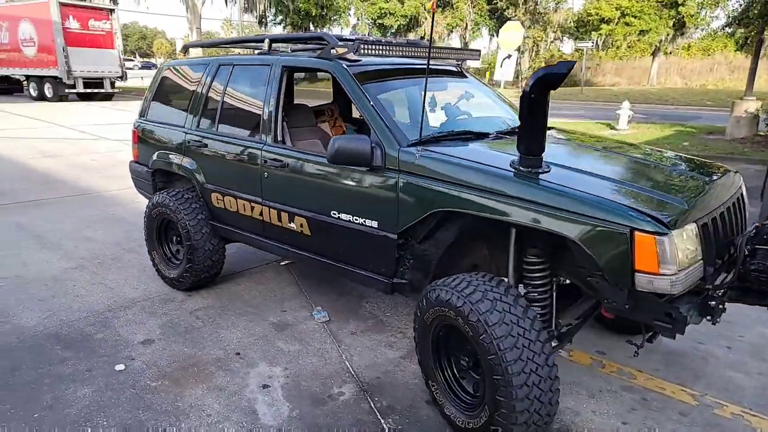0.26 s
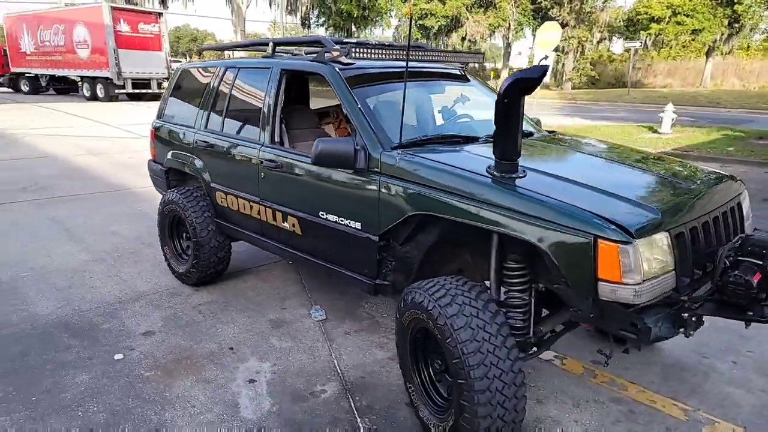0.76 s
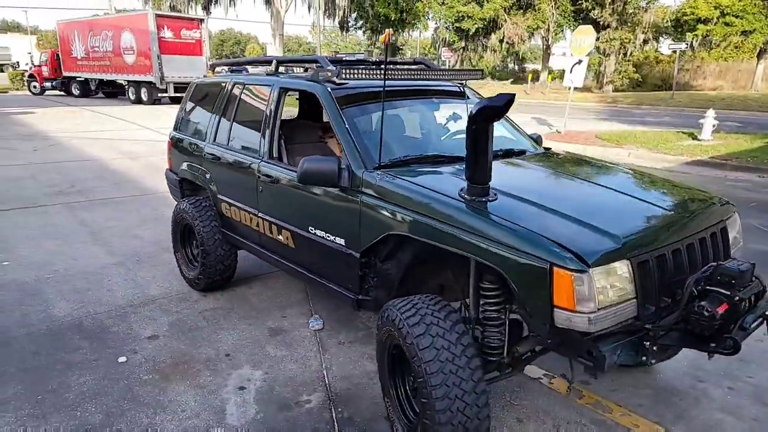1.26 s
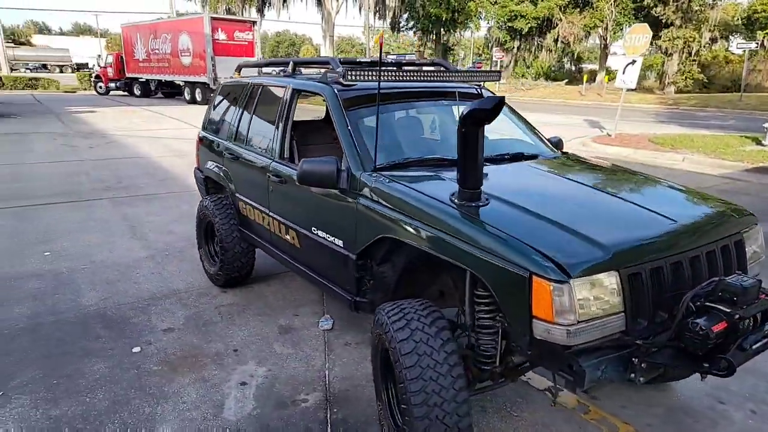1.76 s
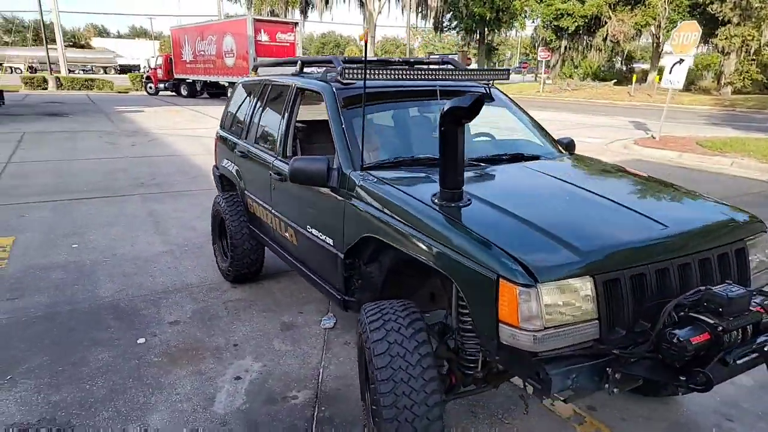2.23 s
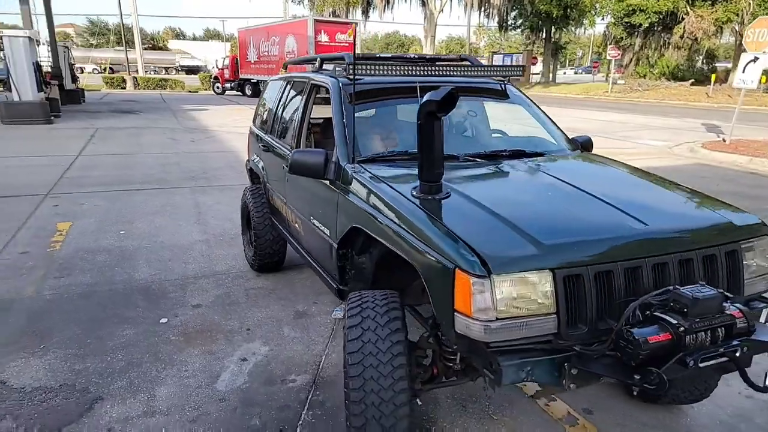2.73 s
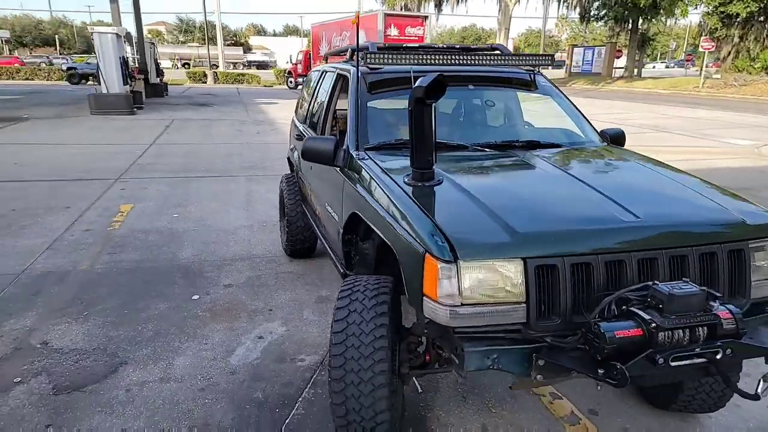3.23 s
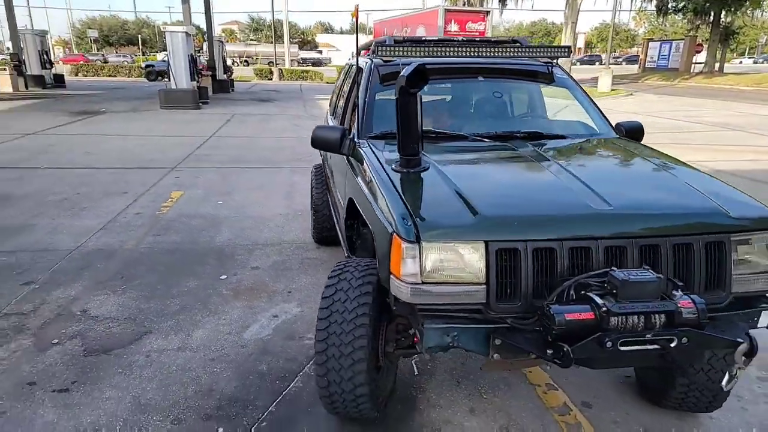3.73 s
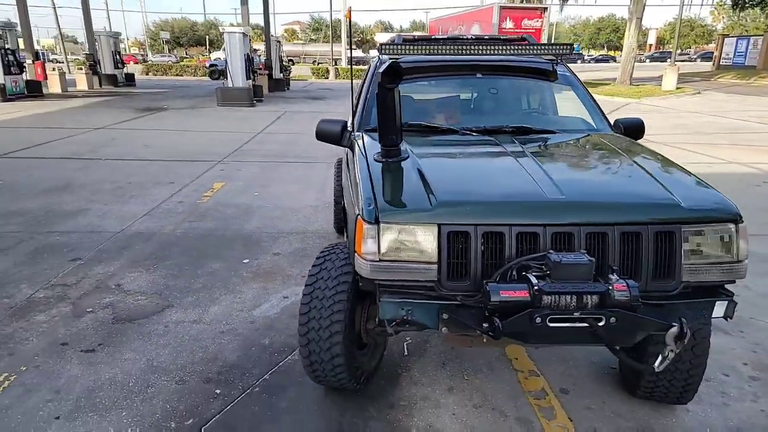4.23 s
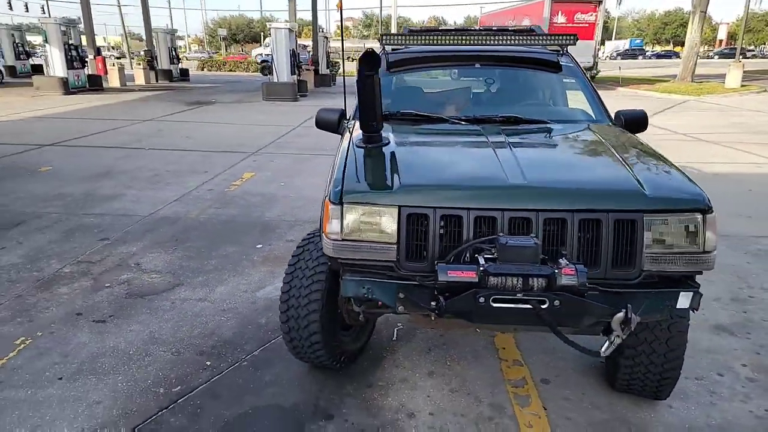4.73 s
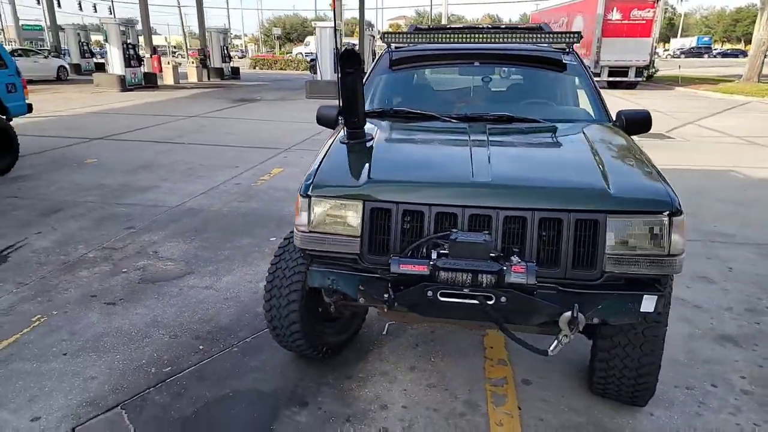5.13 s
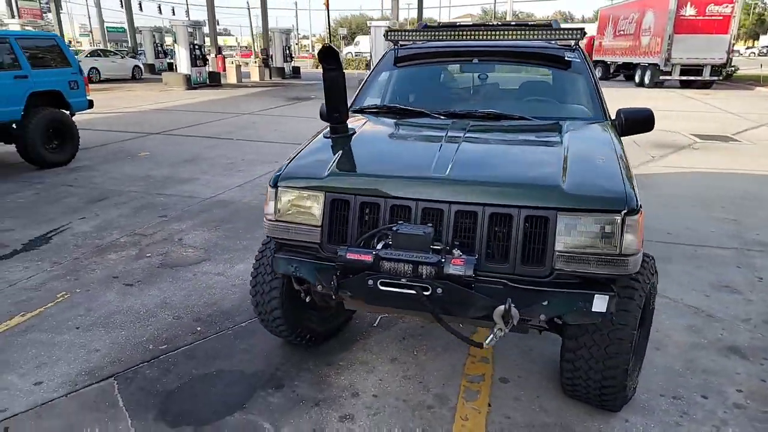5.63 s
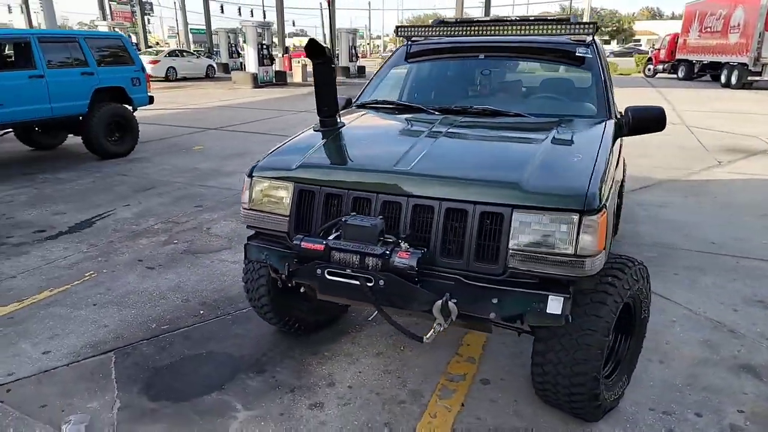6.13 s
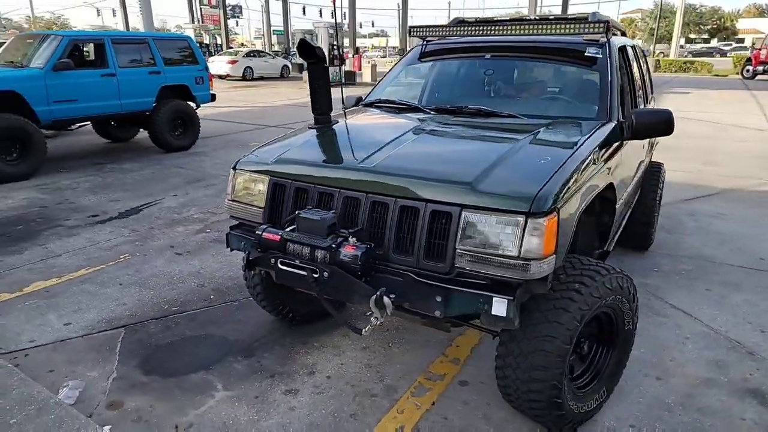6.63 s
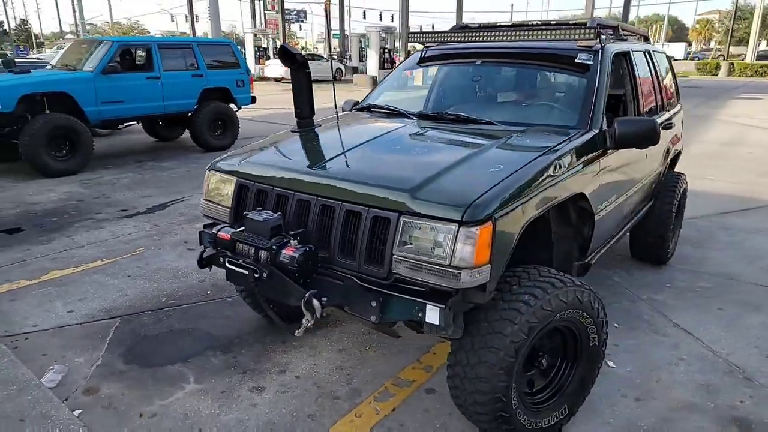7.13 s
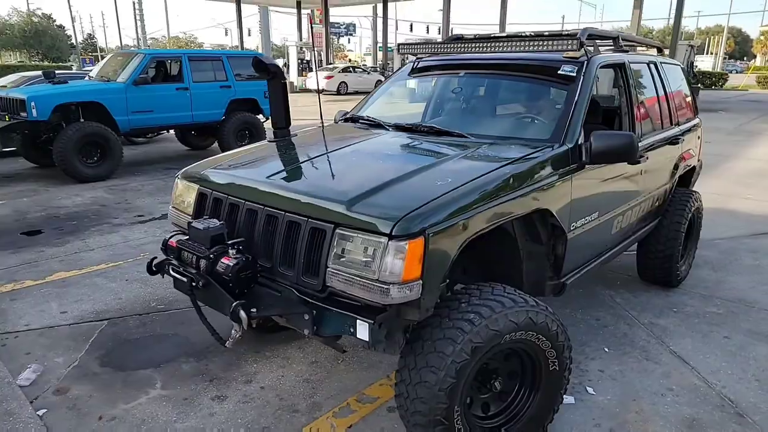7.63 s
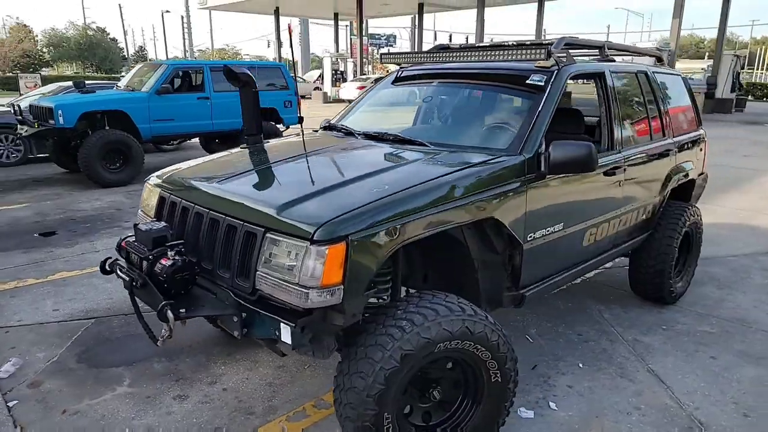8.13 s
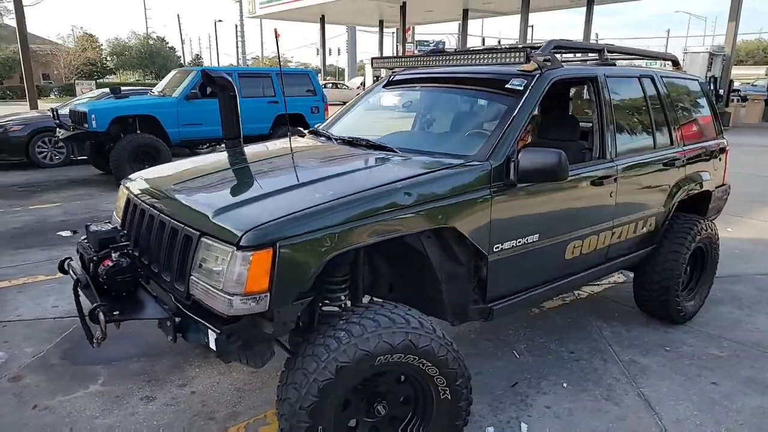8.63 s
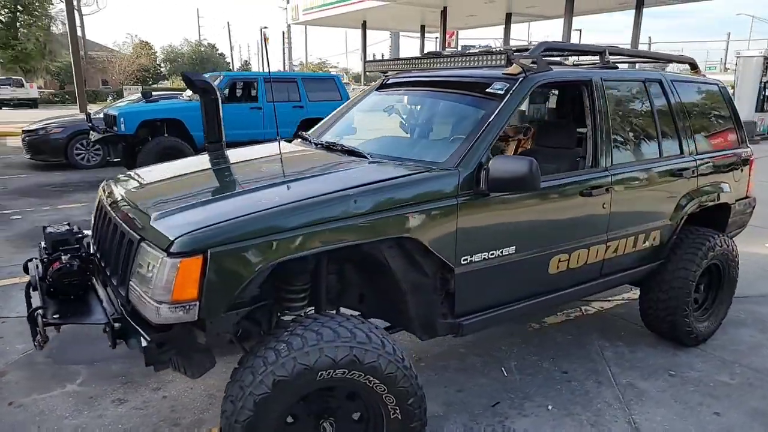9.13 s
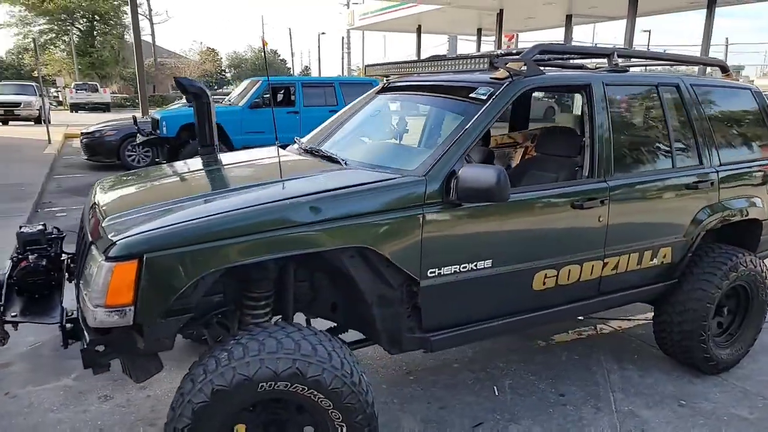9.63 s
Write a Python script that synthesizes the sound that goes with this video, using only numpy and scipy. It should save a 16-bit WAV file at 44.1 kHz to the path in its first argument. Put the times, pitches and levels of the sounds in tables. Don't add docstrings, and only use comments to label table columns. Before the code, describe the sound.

Deep droning diesel idle on an open forecourt, with light metallic ticking, a thin brake squeal midway, and another engine starting up late.

```python
import sys
import numpy as np
from scipy import signal
from scipy.fft import rfft, irfft, next_fast_len
from scipy.io import wavfile
from scipy.ndimage import map_coordinates

SR = 44100
rng = np.random.default_rng(int(sys.argv[2]) if len(sys.argv) > 2 else 0)


def put_to_file(sound):
    columns = np.atleast_2d(sound).T
    safe = np.clip(columns, -1, 1)
    whole_steps = np.round(safe * 32767)
    wavfile.write(sys.argv[1], SR, whole_steps.astype(np.int16))


def gain_from_db(level_db):
    decades = np.asarray(level_db, float) / 20
    return 10 ** decades


N = 435266
T_S = np.arange(N) / SR


def rms_one(x):
    return x / np.sqrt(np.mean(x ** 2) + 1e-20)


def in_time(rows):
    s, *columns = np.transpose(rows)
    return [np.interp(T_S, s, column) for column in columns]


def at_hz(points, hz):
    table_hz, value = np.transpose(points)
    return np.interp(np.log(hz), np.log(table_hz), value)


def shifted(x, s):
    return np.interp(np.arange(N) - s * SR, np.arange(N), x)


def drift(rate_hz):
    r = np.exp(-80 * np.pi * rate_hz / SR)
    white = rng.standard_normal(N // 40 + 2002)
    slow = signal.lfilter([1], [1, -2 * r, r * r], white)[2000:]
    return np.interp(np.arange(N) / 40, np.arange(len(slow)), rms_one(slow))


def resonate(x, hz, width_hz):
    r = np.exp(-np.pi * width_hz / SR)
    poles = [1, -2 * r * np.cos(2 * np.pi * hz / SR), r * r]
    return signal.lfilter([(1 - r * r) / 2, 0, (r * r - 1) / 2], poles, x)


def two_ports(x, lead_ms, order=3):
    later = np.arange(N) - lead_ms * SR / 1000
    return np.array([x, map_coordinates(x, [later], order=order, mode="nearest")])


FIRING_HZ = 37.25
# time_s, lead_firings (ahead of a steady engine)
IDLE_HUNTING = [(0, -.345), (.55, -.39), (1.15, -.215), (1.6, -.29), (1.95, -.215), (2.2, -.3), (2.6, -.14),
                (3.1, -.245), (3.7, -.23), (4.8, -.385), (5.35, -.305), (5.7, -.405), (6.05, -.31),
                (7.2, -.3), (7.6, -.1), (7.9, -.29), (8.95, -.42), (9.3, -.33)]
# time_s, jump_firings
COUNT_JUMPS = [
    (.27, -.272),
    (8.93, .32),
    (9.7, -.1),
]


def firings():
    count = FIRING_HZ * T_S + in_time(IDLE_HUNTING)[0] + 0.272
    for s, jump in COUNT_JUMPS:
        count = count + jump * np.clip((T_S - s) / 0.2 + 0.5, 0, 1)
    return count


def per_firing(count, spread_db):
    return gain_from_db(spread_db * np.interp(count, np.arange(-2, 400), rng.standard_normal(402)))


# time_s, boom_db, first_order_db, third_order_db
EXHAUST_TONES = [(0, -11, -27, -36.5), (1.0, -13, -44, -32), (1.4, -14, -38.5, -28.5),
                 (1.95, -14.5, -40, -28), (2.2, -16, -42, -27.5), (2.55, -15, -36, -26.5),
                 (3.2, -20.5, -39, -29.5), (3.7, -23.5, -39, -34), (4.15, -19.5, -42, -39),
                 (4.6, -14, -43.5, -33.5), (5.25, -12.5, -44, -31.5), (6.1, -12, -46, -46.5),
                 (6.75, -16.5, -40, -33), (7.35, -22.5, -41, -30), (7.97, -26, -36, -36),
                 (8.35, -18, -39, -41), (9.2, -15, -38, -30.5), (9.87, -14.5, -35, -33.5)]
# multiple (of the six-firing cycle), level_db, loudest_s
UPPER_ORDERS = [(21, -39.5, 4.7), (24, -38, 2.7), (30, -40, 4.6), (34, -55.5, 2.6), (36, -51.5, 2.4),
                (42, -46.5, 5.6), (67.87, -55.5, .6), (81.65, -58.5, 3.4), (101.8, -57.5, 2.8)]
# time_s, lead_ms (left hears the idling engine first), second_engine_share
BEARING = [(0, 0.43, 0.0054), (4, 0.47, 0.014), (5.2, 0.39, 0.011), (5.9, 0.34, 0.018), (7.3, 0.29, 0.28),
           (7.85, 0.27, 0.27), (8.0, 0.23, 0.49), (8.7, 0.46, 0.79), (9.87, 0.29, 0.77)]
PORT_GAP_S, PAN_LIMIT_DB = 0.6, 2
LEAD_RAD_PER_MS, NULL_DB, NULL_RAD_PER_DB = 0.79, -19, 0.2
WANDER_DB, WANDER_HZ = 2, 2.5
UPPER_FADE_DB_PER_S = 1.3


def exhaust(count):
    boom_db, first_db, third_db = in_time(EXHAUST_TONES)
    gap_db = shifted(boom_db, PORT_GAP_S / 2) - shifted(boom_db, -PORT_GAP_S / 2)
    pan_db = PAN_LIMIT_DB * np.tanh(gap_db / PAN_LIMIT_DB)
    null_depth_db = np.maximum(NULL_DB - boom_db, 0)
    lead_rad = LEAD_RAD_PER_MS * in_time(BEARING)[0] + NULL_RAD_PER_DB * null_depth_db
    turn = 2 * np.pi * count
    left = gain_from_db(boom_db + pan_db / 2) * np.cos(2 * turn)
    right = gain_from_db(boom_db - pan_db / 2) * np.cos(2 * turn - lead_rad)
    boom = np.array([left, right])

    right_only = np.array([[0], [1]])
    first_db = first_db + WANDER_DB * drift(WANDER_HZ)
    third_db = third_db + WANDER_DB * drift(WANDER_HZ)
    first = gain_from_db(first_db + [[-1], [1]]) * np.cos(turn + 1.1 - 0.5 * right_only)
    third = gain_from_db(third_db) * np.cos(3 * turn - 0.3 - 0.25 * right_only)
    upper = 0
    for multiple, db, loudest_s in UPPER_ORDERS:
        level_db = db - UPPER_FADE_DB_PER_S * np.abs(T_S - loudest_s) + 1.8 * drift(1.5)
        phase = rng.uniform(0, 2 * np.pi) - 0.55 * right_only
        upper = upper + gain_from_db(level_db) * np.cos(round(multiple) * turn / 6 + phase)

    uneven = boom * per_firing(count, spread_db=0.35) + (third + upper) * per_firing(count, spread_db=1.5)
    return np.sqrt(2) * (uneven + first)


CYLINDER_DB = [-1, -9.5, -1, -1, -14.5, -4.5]
# centre_hz, width_hz, level_db
TICK_BODY = [(13500, 1100, 0), (14800, 1100, -1), (12400, 900, -10), (7900, 900, -15)]
# time_s, peak_db
HARD_TICKS = [(0.5027, -42), (0.6633, -44), (0.9552, -42), (1.1438, -51), (1.1966, -40), (1.3049, -45),
              (1.6296, -44), (1.709, -60), (1.9504, -47), (2.1944, -50), (2.9152, -52), (3.0774, -45),
              (3.1327, -54), (3.2405, -45), (3.3178, -48), (3.5662, -46), (3.7204, -44), (4.2058, -43),
              (4.3644, -45), (4.4203, -45), (4.5281, -45), (4.6897, -51), (4.7431, -42), (4.8513, -44),
              (4.9027, -52), (5.012, -44), (5.1716, -48), (5.4694, -54), (5.5098, -48), (8.1264, -53)]
# time_s, view_db
VIEW = [(0, -1), (.9, -1), (1.7, 0), (2.5, 0.5), (3.3, 0), (4.0, 1), (4.5, 0.5), (5.3, -1.5), (6.2, -2),
        (7.4, -2), (8.0, -1.5), (9.87, -2.5)]
TICK_LEVEL_DB, TICK_VIEW_SHARE, TICK_LOSS_DB_PER_S = -56, 2.5, 1.4


def injectors(count):
    since = count - 0.25
    number = np.floor(since).astype(int) + 6
    strength = gain_from_db(np.array(CYLINDER_DB)[number % 6] + 3.0 * rng.standard_normal(400)[number])
    age_s = (since % 1) / FIRING_HZ
    bursts = strength * (1 - np.exp(-age_s / 0.0015)) * np.exp(-age_s / 0.012)
    steady_db = TICK_LEVEL_DB + TICK_VIEW_SHARE * in_time(VIEW)[0] - TICK_LOSS_DB_PER_S * T_S
    steady = gain_from_db(steady_db) * rms_one(bursts)

    strikes = np.zeros(N)
    for s, peak_db in HARD_TICKS:
        strikes[round(s * SR)] = gain_from_db(peak_db - 6.5)
    tail_s = np.arange(SR // 20) / SR
    decay = (1 - np.exp(-tail_s / 0.002)) * np.exp(-tail_s / 0.013)
    hard = signal.fftconvolve(strikes, decay)[:N]

    def ring(x):
        return sum(gain_from_db(db) * resonate(x, hz, width_hz) for hz, width_hz, db in TICK_BODY)

    white = rng.standard_normal((2, N))
    port_gain = gain_from_db([[3.1], [-7]])
    return ring((steady + hard) * white) / np.std(ring(white[0])) * port_gain


# level_db, view_share, walk_loss_db_per_s, second_engine_db
ROAR_LEVELS = [
    (-36, 0.45, 0, 4),
    (-42, 0.99, .1, 3.5),
    (-44.5, 1.0, 0.12, 0.5),
    (-53, .5, .5, 1),
]
CATCH_S, CATCH_RISE_S, FLARE, FLARE_S = 7.86, 0.08, 0.31, 0.44


def roar_db():
    view_db = in_time(VIEW)[0]
    flare = 1 + FLARE * np.exp(-np.abs(T_S - CATCH_S) / FLARE_S)
    running = np.clip((T_S - CATCH_S) / CATCH_RISE_S, 0, 1) * flare
    return [db + share * view_db - loss * T_S + added * running for db, share, loss, added in ROAR_LEVELS]


# low_hz, high_hz
ZONES_HZ = [
    (125, 300),
    (300, 1000),
    (1000, 5000),
    (5000, 11000),
]
# freq_hz, level_db_per_hz
COLOUR = [(130, -1), (170, -8.5), (230, -14.5), (330, -19.5), (480, -22.5), (1100, -26), (2200, -32),
          (2900, -34), (3600, -35.5), (5000, -41.5), (6700, -46), (7900, -44), (10500, -51.5), (15500, -54)]
# freq_hz, level_db_per_hz
DEEP_COLOUR = [(20, -22), (29, -13), (47, -12), (62, -6), (88, -3), (102, -5)]
# freq_hz, power_share
DIRECT_SHARE = [(60, 0.57), (300, 0.5), (1000, 0.62), (4000, 0.084), (12000, 0.061)]
# freq_hz, correlation
SCATTER_LIKENESS = [(100, 0.99), (250, 0.81), (600, -0.0024), (1200, 0.26), (2500, -0.11)]
# freq_hz, left_minus_right_db
PORT_BALANCE = [(100, 0), (700, -0.1), (2400, 1), (8000, 1.5), (15000, 9)]
SECOND_LEAD_MS = -0.32


def roar():
    lead_ms, second = in_time(BEARING)
    near, other, mid, side = rng.standard_normal((4, N))
    direct = np.sqrt(1 - second) * two_ports(near, lead_ms)
    direct = direct + np.sqrt(second) * two_ports(other, SECOND_LEAD_MS)

    size = next_fast_len(N)
    hz = np.maximum(np.arange(size // 2 + 1) * SR / size, 1)
    share, alike = at_hz(DIRECT_SHARE, hz), at_hz(SCATTER_LIKENESS, hz)
    opposed = np.array([[1], [-1]])
    scattered = np.sqrt(1 + alike) * rfft(mid, size) + opposed * np.sqrt(1 - alike) * rfft(side, size)
    field = np.sqrt(share) * rfft(direct, size) + np.sqrt((1 - share) / 2) * scattered
    colour = gain_from_db(at_hz(DEEP_COLOUR + COLOUR[1:], hz))
    field = field * colour * gain_from_db(at_hz(PORT_BALANCE, hz) / 2 * opposed)

    centres_hz = [np.sqrt(low * high) for low, high in ZONES_HZ]
    place = np.interp(np.log(hz), np.log(centres_hz), np.arange(4))
    out, together = 0, drift(1.8)
    for k, ((low, high), db) in enumerate(zip(ZONES_HZ, roar_db())):
        inside = (hz > low) & (hz < high)
        zone_rms = np.sqrt(2 * np.sum(colour[inside] ** 2) / size)
        crossfade = np.clip(1 - np.abs(place - k), 0, 1)
        zone = irfft(field * crossfade, size)[:, :N] / zone_rms
        out = out + gain_from_db(db + 2.0 + 0.94 * together + 0.5 * drift(17.0)) * zone
    return out


# start_s, end_s, pitch_hz, width_hz,
# level_db
HUMS = [(0.42, 1.5, 410, 30, -44), (2.4, 2.9, 300, 17, -47.5), (1.9, 3.3, 249, 92, -42),
        (7.9, 8.85, 480, 82, -47.5), (2.5, 4.5, 135, 25, -36), (8.4, 8.85, 55, 2.4, -33),
        (8.3, 8.85, 167, 2.6, -35), (8.55, 8.85, 143, 7.4, -32), (8.55, 8.85, 210, 8.1, -34.5),
        (9.0, 9.9, 260, 13, -37.5), (9.0, 9.9, 188, 7.2, -47.5), (8.0, 9.8, 327, 54, -42.5),
        (7.86, 8.0, 350, 14, -39)]


def hums():
    out = np.zeros(N + SR)
    for start_s, end_s, hz, width_hz, db in HUMS:
        first, size = round(start_s * SR), round((end_s - start_s) * SR)
        once = resonate(rng.standard_normal(2 * SR), hz, width_hz * 1.3)
        band = resonate(once, hz, width_hz * 1.3)[-size:]
        swell = np.minimum(2 * np.bartlett(size), 1)
        out[first:first + size] += gain_from_db(db) * rms_one(band) * swell
    return out[:N]


# start_s, length_s, from_hz, to_hz, level_db
SQUEALS = [
    (5.5, 0.12, 11600, 11680, -53),
    (5.6, .16, 11800, 11930, -65),
    (5.78, 0.18, 11900, 11700, -58),
    (5.985, .07, 11700, 11630, -55),
    (6.04, 0.28, 11625, 11625, -53),
    (6.29, .1, 11640, 11680, -62),
    (7.885, 0.16, 11580, 11600, -66),
]
SQUEAL_RISE_SHARE, SQUEAL_PAN_DB = 0.35, 12


def brake():
    pitch_points, level = [], 0
    for s, length_s, from_hz, to_hz, db in SQUEALS:
        pitch_points += [(s + 0.01, from_hz), (s + length_s - 0.01, to_hz)]
        corners_s = s + length_s * np.array([0, SQUEAL_RISE_SHARE, 1])
        level = level + gain_from_db(db) * np.interp(T_S, corners_s, [0, 1, 0]) ** 0.77
    hz = in_time(pitch_points)[0] + 9.9 * drift(39.9)
    turn = 2 * np.pi * np.cumsum(hz) / SR
    waves = np.array([np.sin(turn), np.sin(turn + 1.5)])
    gain_db = 3.4 * drift(30.0) + SQUEAL_PAN_DB / 2 * np.array([[1], [-1]])
    return 1.2 * level * gain_from_db(gain_db) * waves


# start_s, level_db, length_s, low_hz, high_hz
SCUFFS = [
    (6.345, -43, .065, 1300, 4400),
    (6.35, -59, .045, 5500, 10000),
    (6.64, -51, .055, 1500, 5000),
    (8.806, -29, .06, 130, 480),
    (7.88, -38, .2, 230, 650),
]
SCUFF_RISE_SHARE = 0.12


def footfall():
    out, t = np.zeros(N), np.arange(SR // 5) / SR
    for s, db, length_s, low_hz, high_hz in SCUFFS:
        band = signal.butter(2, [low_hz, high_hz], "band", fs=SR, output="sos")
        grit = rms_one(signal.sosfilt(band, rng.standard_normal(len(t))))
        swell = np.interp(t, [0, SCUFF_RISE_SHARE * length_s, length_s], [0, 1, 0])
        out[round(s * SR):][:len(t)] += gain_from_db(db) * grit * swell
    return out


# time_s, pitch_hz, level_db
START = [(7.5, 77, -42), (7.64, 81, -23), (7.74, 84, -22), (7.82, 85, -32), (7.885, 91, -27),
         (7.925, 97, -17), (7.99, 110, -24), (8.15, 142, -30), (8.3, 156, -42)]
# multiple, level_db
START_ORDERS = [(1, 0), (2, -12), (3, -24), (4, -28)]


def second_engine():
    hz, db = in_time(START)
    fade = np.interp(T_S, [7.45, 7.5, 8.3, 8.35], [0, 1, 1, 0])
    turn = 2 * np.pi * np.cumsum(hz) / SR
    tone = sum(gain_from_db(o_db + 0.7 * k * drift(14)) * np.cos(k * turn) for k, o_db in START_ORDERS)
    return np.sqrt(2) * gain_from_db(db) * fade * tone


def scene():
    count = firings()
    lead_ms = np.where(np.arange(N) < 5 * SR, BEARING[0][1], SECOND_LEAD_MS)
    neighbours = two_ports(second_engine() + hums(), lead_ms, order=1)
    return exhaust(count) + injectors(count) + roar() + neighbours + brake() + footfall()


def roll_off(x):
    return signal.sosfilt(signal.butter(12, 16440, fs=SR, output="sos"), x)


# cut_s, fade_start_s, fade_end_s
DROPOUTS = [
    (.1641, .3635, .380),
    (8.83057, 9.0305, 9.047),
]
CUT_S, CUTOFF_HZ = 2 / SR, 15550


def record(dry):
    gate = np.ones(N)
    for cut_s, start_s, end_s in DROPOUTS:
        back = np.sin(np.pi / 2 * np.clip((T_S - start_s) / (end_s - start_s), 0, 1)) ** 2
        gate = gate * np.maximum(np.clip(1 - (T_S - cut_s) / CUT_S, 0, 1), back)
    low_pass = signal.ellip(12, 0.5, 70, CUTOFF_HZ, fs=SR, output="sos")
    return roll_off(signal.sosfilt(low_pass, dry) * gate)


dry = scene()
out = record(dry)
put_to_file(out)
```